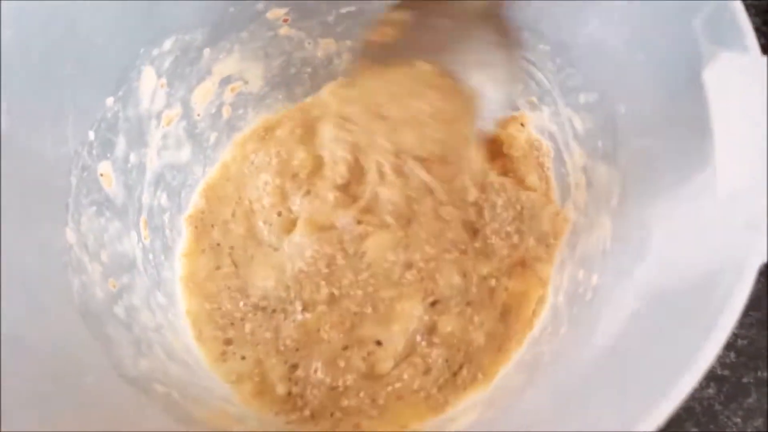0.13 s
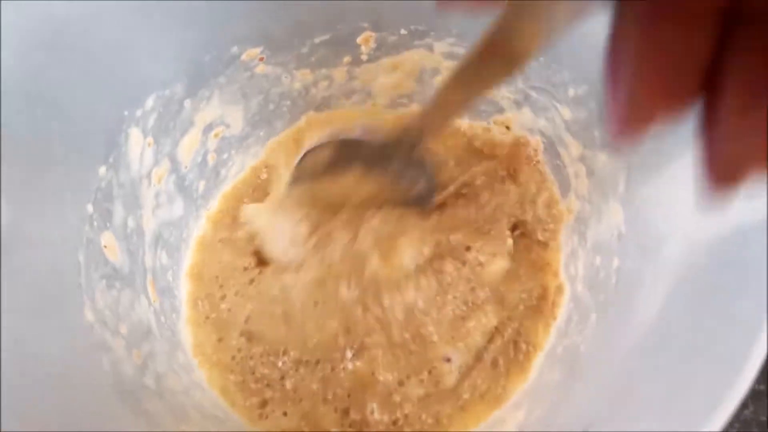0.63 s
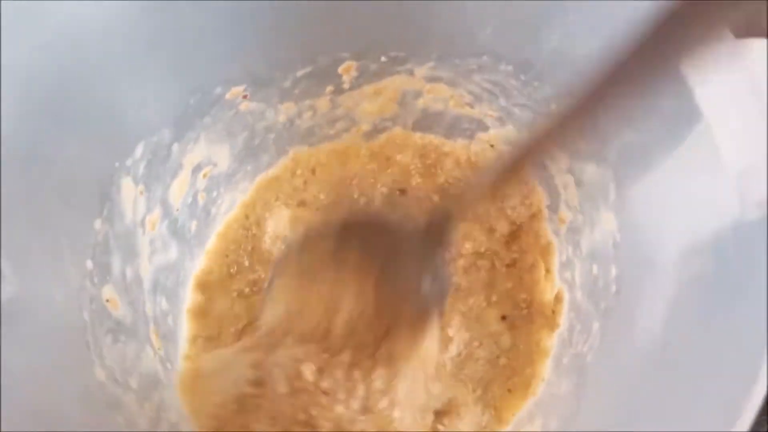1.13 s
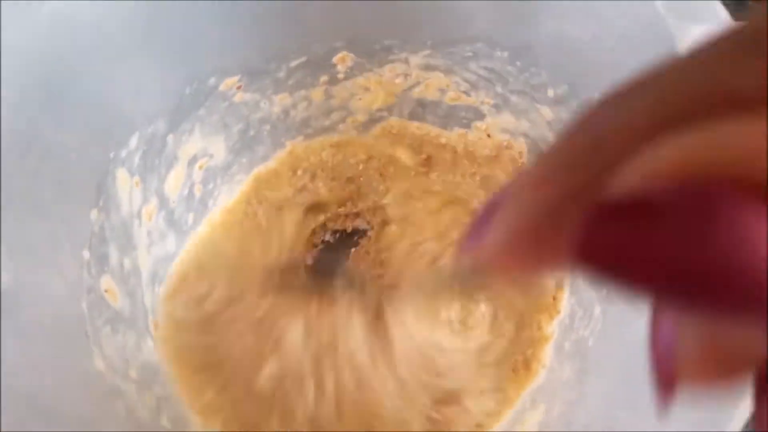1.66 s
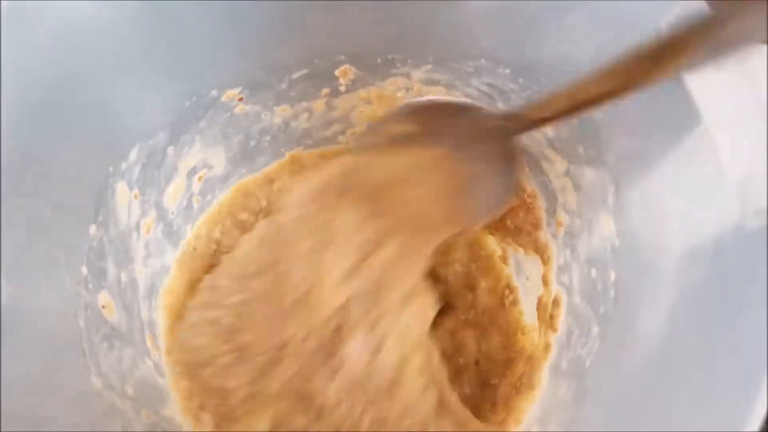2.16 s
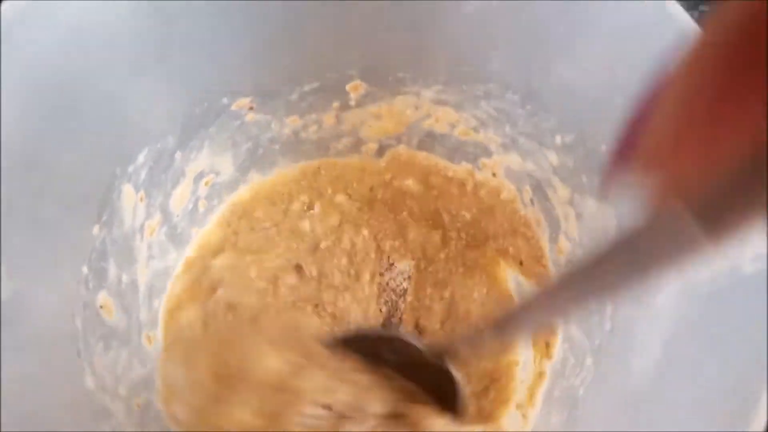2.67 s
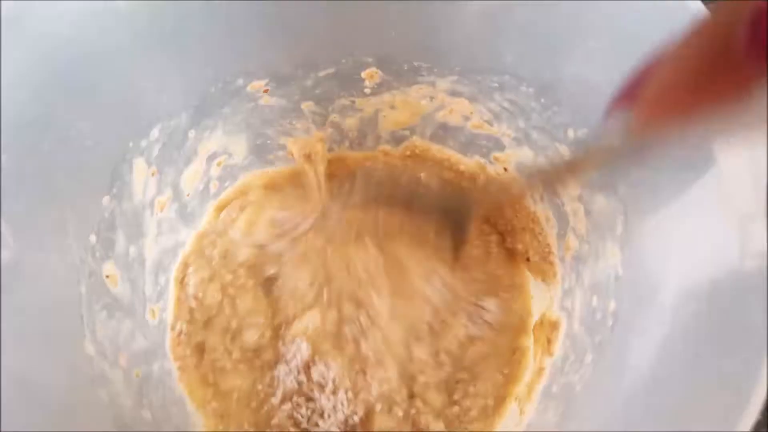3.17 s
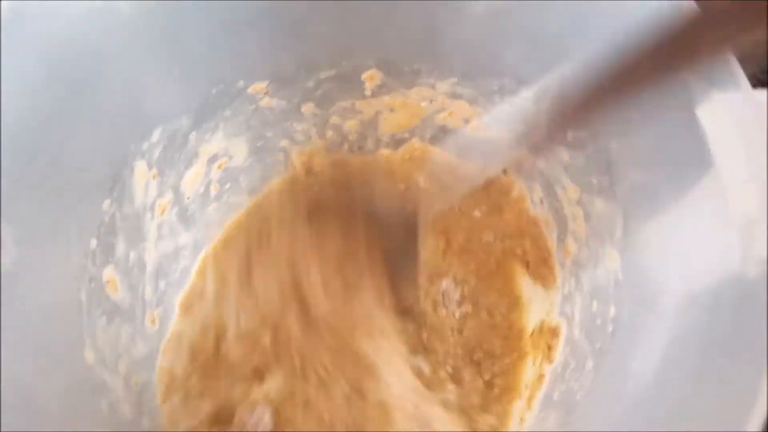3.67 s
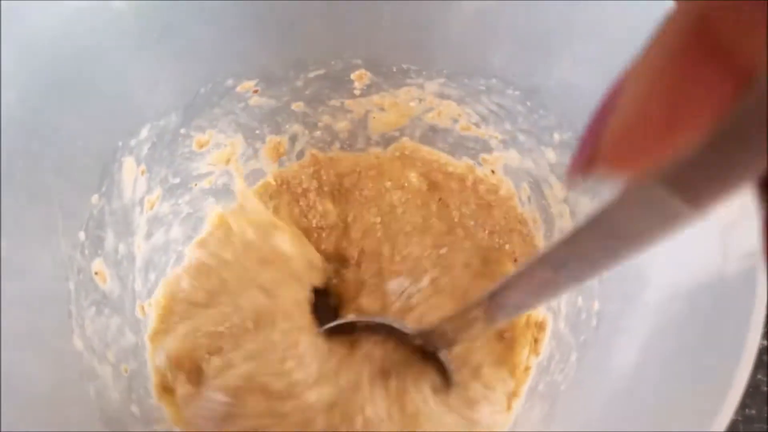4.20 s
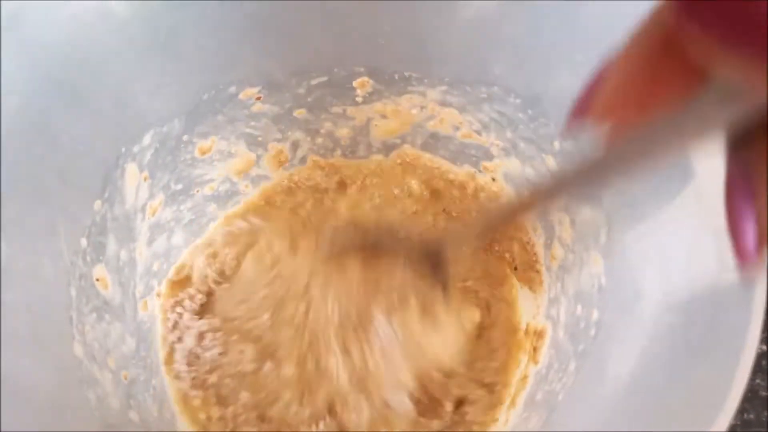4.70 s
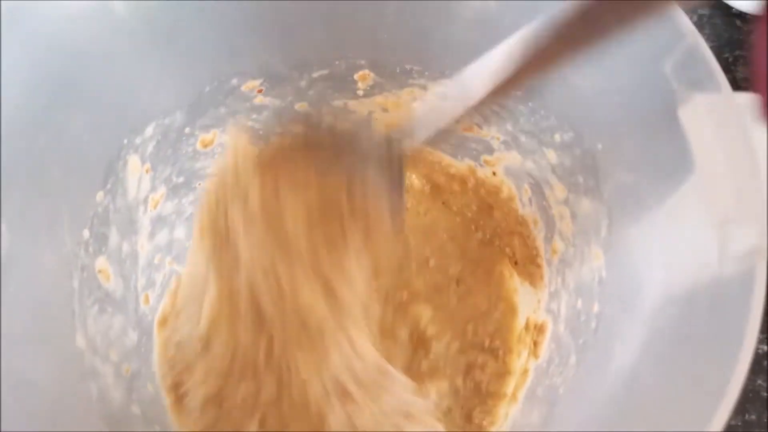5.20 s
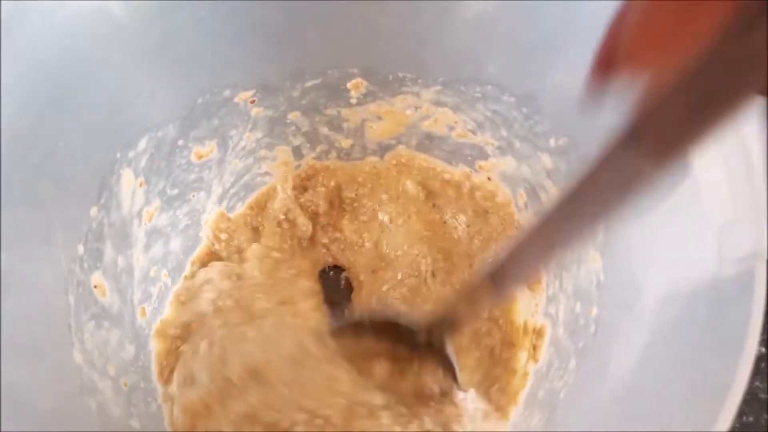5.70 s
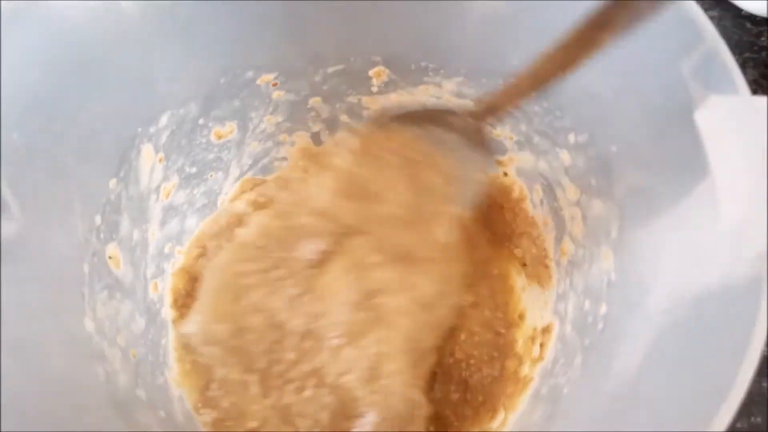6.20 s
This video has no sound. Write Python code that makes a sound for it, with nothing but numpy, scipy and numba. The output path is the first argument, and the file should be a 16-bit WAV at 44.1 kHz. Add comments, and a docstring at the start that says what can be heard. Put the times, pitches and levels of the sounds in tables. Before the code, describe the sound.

Close irregular plastic knocks and short gritty drags of a spoon through sticky batter, with small wet smacks over faint household hum.

```python
"""Spoon beating batter in a plastic jug

A steel spoon beats thick batter on a kitchen worktop, heard just above the rim by two ports.
Knocks ring damped modes of jug and worktop, strokes drag by stick and slip through gritty mix,
and the batter smacks, hisses and ticks as shaped noise. Some knocks and strokes also ring one or
two upper modes. A small hard room of coupled delay lines answers over a faint household hum and hiss."""
import sys
import numpy as np
from scipy import signal
from scipy.fft import rfft, irfft
from scipy.io import wavfile
from scipy.ndimage import uniform_filter1d, map_coordinates
from numba import njit

SR = 44100
rng = np.random.default_rng(int(sys.argv[2]) if len(sys.argv) > 2 else 0)


def transcribe(u):
    """Save the signal u as a 16-bit wav file named by the first command-line argument.

    u: samples, shape (n,) or (channels, n), limited to [-1, 1]; the rate is SR.
    q: integer samples, one column per channel.
    """
    v = np.clip(np.atleast_2d(u).T, -1, 1)
    q = np.round(v * 32767).astype(np.int16)
    wavfile.write(sys.argv[1], SR, q)


def level_to_linear(level):
    """Convert decibel levels to linear amplitude factors, elementwise."""
    exponent = np.asarray(level, float) / 20
    return 10 ** exponent


N = 279594
T = np.arange(N) / SR
# The middling knock, spot and stroke to which the level laws refer.
MIDDLE_DB, MIDDLE_HZ, MIDDLE_HALF_S = -25, 500, 0.03


def level(x, db):
    """Mean power: set the rms level in dB."""
    return x * level_to_linear(db) / np.sqrt(np.mean(x ** 2))


def peak(x, db):
    """Peak amplitude: set the largest excursion in dB."""
    return x * level_to_linear(db) / np.abs(x).max()


def add(out, x, s):
    """Superposition: mix x in at time s."""
    i = int(s * SR)
    out[i:i + len(x)] += x[:N - i]


def colour(x, points):
    """Spectral shaping: filter by (Hz, dB) points joined along log frequency."""
    hz, db = np.transpose(points)
    f = np.arange(len(x) // 2 + 1) * SR / len(x) + 1
    gain = level_to_linear(np.interp(np.log(f), np.log(hz), db))
    return irfft(rfft(x) * gain, len(x))


def ring(modes, gain, detune, length_s=0.425):
    """Modal superposition: the impulse response is a sum of exponentially damped sines."""
    hz, db, t60 = np.transpose(modes)[:, :, None]
    t = T[:int(length_s * SR)]
    decay = np.exp(-np.log(1000) * t / t60)
    return np.sum(gain * level_to_linear(db) * decay * np.sin(2 * np.pi * hz * detune * t), axis=0)


def burst(noise, t60_s):
    """Transient noise: a rise of about half a millisecond, then exponential decay."""
    t = T[:len(noise)]
    return noise * np.exp(-np.log(1000) * t / t60_s) * (1 - np.exp(-t / 0.00058))


def grains(rate, spread_db):
    """Random impulses: sparse clicks of either sign, rate per second, a few much larger than the rest."""
    size = level_to_linear(spread_db * np.minimum(rng.exponential(1, N), 4))
    return (rng.random(N) < rate / SR) * rng.standard_normal(N) * size


# Spoon on the wall. Each row: start in seconds, peak level of the wall in dB, centre of the modes
# that the spot rings in Hz, crack of the edge against the knock in dB.
KNOCKS = [(0.219, -39, 263, -2.5), (0.647, -49, 237, 0.5), (0.791, -33, 556, -9.5), (1.154, -25, 538, -5.5),
          (1.34, -10, 387, -12.5), (1.413, -23, 341, -8.5), (1.673, -23.5, 268, -5), (1.733, -33, 480, -12),
          (1.754, -30.5, 810, -11), (1.766, -28.5, 860, 0), (1.833, -31.5, 311, -35),
          (1.926, -42, 640, -0.5), (2.064, -23.5, 553, -10), (2.105, -31, 650, -3), (2.334, -30.5, 297, -3),
          (2.345, -27, 600, -3), (2.37, -17, 566, -4), (2.449, -30, 430, -5.5), (2.717, -37.5, 855, -2.5),
          (3.004, -20, 550, -15.5), (3.028, -26, 615, 0), (3.158, -49.5, 701, 20.5),
          (3.309, -19, 505, -4.5), (3.389, -10.5, 641, -19), (3.506, -36, 292, 2.5),
          (3.588, -13, 531, -10.5), (3.669, -9, 710, -22), (3.781, -26.5, 480, -21.5), (3.85, -36, 850, 0),
          (3.893, -16.5, 370, -11), (3.911, -42, 459, -9), (4.115, -20, 520, -12.5),
          (4.191, -15.5, 501, -9), (4.425, -34, 800, -2), (4.516, -18, 723, -13), (4.899, -8, 602, -26),
          (5.037, -31.5, 860, -34), (5.112, -21, 527, -12), (5.185, -11.5, 433, -21.5),
          (5.628, -43.5, 806, -7.5), (5.686, -24, 550, -18), (5.695, -24, 707, -11),
          (5.793, -22.5, 367, -23.5), (5.905, -34.5, 410, -5), (6.096, -27, 455, -5.5),
          (6.19, -46.5, 583, 6.5)]
# Jug wall and air. Each row: mode frequency in Hz, relative level in dB, free decay t60 in seconds.
JUG = [(289, -5, 0.044), (344.7, 10, 0.018), (388, -5.5, 0.072), (421, -8, 0.019), (567.5, -12.5, 0.08),
       (615.6, -1, 0.077), (649, 8.5, 0.018), (744, 8.5, 0.018), (956, 5.5, 0.011)]
# Crack of the hard spoon edge. Each row: frequency in Hz, spectral density in dB per Hz.
EDGE = [(600, -5.5), (1100, 9.5), (1450, -8.5), (1900, -2), (2400, -0.5), (4000, -4), (6500, -18),
        (13000, -18.5)]
# Worktop under the jug. Each row: mode frequency in Hz, relative level in dB, t60 in seconds.
WORKTOP = [(60, -12.5, 0.15), (113.5, -13, 0.13), (123.2, -4.5, 0.28), (185, -3, 0.092),
           (203.6, -4.5, 0.29), (214, 13, 0.021)]
# The hand steadies the jug by varying amounts, so more or less reaches the worktop.
# Each row: time in seconds, thump against the crack of the edge in dB.
HOLD = [(0, -4.5), (1.5, -10.5), (2.5, -16), (3.2, -23), (4.5, -9.5), (5.0, -18), (6.3, -20)]
THUMP_FOLLOWS_CRACK, THUMP_DB_PER_OCTAVE = 1, -7  # low spots near the foot shake the worktop more
BODY_LATE_S = 0.0011  # the wall starts just before the crack and swells through it
TOUCH_EARLY_S, TOUCH_DB = 0.012, -27.5  # the batter on the spoon lands just ahead of the steel
SLAM, SLAM_S = 1, 0.0044  # the first cycles stand out before the batter damps the wall
NO_BASS = signal.butter(4, 210, "high", fs=SR, output="sos")


def knocks(spot_octaves=0.76, push_cycles=0.32, detune=0.028, rise_s=0.0016):
    """Impact excitation: a short push rings modes near the struck spot; edge cracks, worktop thumps."""
    body, edge, thump = np.zeros((3, N))
    chance = rng.standard_normal((len(KNOCKS), 2, 16, 1))
    noises = rng.standard_normal((len(KNOCKS), 2, 4096))
    for (s, db, hz, crack_db), (a, b), (noise, rock) in zip(KNOCKS, chance, noises):
        push = np.hanning(int(push_cycles * SR / hz) + 3)
        # the spoon chatters on after the blow
        push = np.convolve(push, np.r_[1, 0.014 * burst(noise, 0.05)])

        near = np.exp(-(np.log2(np.array(JUG)[:, :1] / hz) / spot_octaves) ** 2 / 2)
        modes = ring(JUG, near * level_to_linear(3.2 * a[:len(JUG)]), 1 + 0.0077 * b[:len(JUG)], 0.14)
        wall = np.convolve(modes, push)
        t = T[:len(wall)]
        # the bending wave needs a cycle to spread, and the small wall radiates no bass
        wall = signal.sosfilt(NO_BASS, wall * (1 - np.exp(-(t / rise_s) ** 2)))
        wall = wall * (1 + SLAM * np.exp(-(t / SLAM_S) ** 2))
        add(body, peak(wall, db), s + BODY_LATE_S)
        add(body, peak(wall, db + TOUCH_DB), s - TOUCH_EARLY_S)

        crack = burst(colour(noise, EDGE), 0.04) + 7.45 * burst(colour(rock, EDGE), 0.0041)
        add(edge, peak(crack, db + crack_db), s + rise_s)

        low = ring(WORKTOP, level_to_linear(3.0 * a[:len(WORKTOP)]), 1 + detune * b[:len(WORKTOP)])
        thump_db = (MIDDLE_DB + THUMP_FOLLOWS_CRACK * (db + crack_db - MIDDLE_DB)
                    + np.interp(s, *np.transpose(HOLD))
                    + THUMP_DB_PER_OCTAVE * np.log2(hz / MIDDLE_HZ))
        # the jug rocks on its foot for a moment, so the worktop is shaken rather than struck once
        add(thump, peak(signal.fftconvolve(low, burst(rock, 0.46)), thump_db), s)
    return body, edge, thump


# Strokes dragged through the mix. Each row: centre in seconds, half length in seconds,
# jug wall level at the centre in dB.
DRAG = [(0.187, 0.21, -72), (0.486, 0.033, -52), (0.675, 0.019, -57.5), (0.841, 0.041, -57),
        (1.029, 0.04, -59.5), (1.214, 0.038, -59), (1.474, 0.06, -50), (1.759, 0.013, -47),
        (1.8, 0.06, -57.5), (2.101, 0.025, -51.5), (2.198, 0.11, -59.5), (2.563, 0.037, -58),
        (2.624, 0.02, -59.5), (2.745, 0.042, -52.5), (2.917, 0.036, -53), (3.107, 0.056, -51),
        (3.242, 0.014, -54.5), (3.503, 0.015, -59.5), (3.616, 0.0062, -49), (3.72, 0.13, -47.5),
        (3.924, 0.012, -44), (3.98, 0.041, -57), (4.227, 0.0085, -42), (4.298, 0.04, -57),
        (4.61, 0.076, -60), (4.713, 0.036, -62.5), (4.98, 0.11, -56.5), (5.041, 0.011, -52.5),
        (5.125, 0.0075, -53), (5.295, 0.054, -53), (5.5, 0.03, -64.5), (5.66, 0.0061, -56),
        (5.729, 0.0093, -40), (5.782, 0.032, -56.5), (6.213, 0.041, -54)]
# Quick strokes scratch, slow ones rumble: grit against the wall, and its change per doubled length.
GRIT_DB, GRIT_DB_PER_DOUBLING = -4.5, -5
# After each knock the spoon skids on along the wall; the skid's grit is set against the crack.
SKID_AFTER_S, SKID_HALF_S, SKID_WALL_DB, SKID_FOLLOWS_KNOCK, SKID_GRIT_DB = 0.045, 0.032, -59, 0.8, -34


def stroke_gains():
    """Power addition: bell-shaped strokes and skids sum into gains for the wall and the grit."""
    s, half_s, wall_db = np.transpose(DRAG)
    hit_s, hit_db, _, crack_db = np.transpose(KNOCKS)
    grit_db = wall_db + GRIT_DB + GRIT_DB_PER_DOUBLING * np.log2(half_s / MIDDLE_HALF_S)

    s = np.r_[s, hit_s + SKID_AFTER_S][:, None]
    half_s = np.r_[half_s, np.full(len(KNOCKS), SKID_HALF_S)][:, None]
    wall_db = np.r_[wall_db, SKID_WALL_DB + SKID_FOLLOWS_KNOCK * (hit_db - MIDDLE_DB)][:, None]
    grit_db = np.r_[grit_db, hit_db + crack_db + SKID_GRIT_DB][:, None]

    coarse = T[::32]
    swell = np.exp(-((coarse - s) / half_s) ** 2)
    return [np.interp(T, coarse, np.sqrt(np.sum(level_to_linear(2 * db) * swell, axis=0))) for db in (wall_db, grit_db)]


# Grit under the edge. Each row: frequency in Hz, spectral density in dB per Hz.
GRIT = [(700, -34), (1100, -3.5), (1550, -1), (1850, 1), (2300, -4), (4200, -7.5), (6000, -22),
        (11000, -19.5), (16000, -22)]
# Upper ring of spoon and wall, damped by the batter. Each row: nominal mode frequency in Hz,
# relative level in dB, t60 in seconds.
CLACK = [(1620, -3, 0.029), (1815, 3.5, 0.04), (1990, 2, 0.09), (2887, -12.5, 0.041)]
CLACK_IN_GRIT_DB = -12.5  # against the grit


def drag():
    """Stick-slip friction: slips shake the damped wall, grains crackle, torn batter hisses."""
    wall_gain, grit_gain = stroke_gains()
    # the grip is never even: it catches and lets go a hundred times a second
    catch = level_to_linear(level(uniform_filter1d(rng.standard_normal(N), size=300), 0)) ** 3.0

    slips = grains(1300, 1.6) + 0.21 * rng.standard_normal(N)
    signs = rng.choice([-1, 1], (len(JUG), 1))
    # the spoon pressed on the wall halves every decay time
    pressed = np.array(JUG) * [1, 1, 0.5]
    wall = level(signal.fftconvolve(slips * catch, ring(pressed, signs, 1, 0.1))[:N], 0)

    scratch = (grains(1400, 3.0) + 0.3 * rng.standard_normal(N)) * catch
    clack = signal.fftconvolve(scratch, ring(CLACK, 1, 1, 0.06))[:N]
    grit = level(colour(scratch, GRIT), 0) + level(clack, CLACK_IN_GRIT_DB)

    # the hiss comes from a wide patch, so each port hears its own
    hiss_tone = [(1500, -29.0), (5000, 6.5), (12000, 1)]
    hiss = np.array([colour(v * np.sqrt(catch), hiss_tone) for v in rng.standard_normal((2, N))])
    return wall * wall_gain, grit * grit_gain, level(hiss, -12.5) * grit_gain


# Wet smacks of the batter. Each row: start in seconds, peak level in dB, centre frequency in Hz.
SMACKS = [(1.245, -46, 4630), (1.485, -35.5, 3650), (1.498, -39, 7700), (1.6726, -19.5, 12200),
          (1.744, -29.5, 4160), (1.795, -32, 11200), (1.809, -47, 6530), (1.8842, -45, 8700),
          (1.929, -36.5, 6660), (2.0506, -43.5, 10100), (2.093, -42, 3830), (2.4274, -33, 3300),
          (2.438, -38, 2500), (2.911, -37, 11100), (3.227, -34, 2960), (3.238, -38, 4530),
          (3.319, -35, 7100), (3.381, -58, 3800), (3.496, -42.5, 3160), (3.661, -44.5, 2320),
          (3.8113, -40.5, 3370), (3.8487, -32.5, 2840), (4.1697, -34, 3650), (4.229, -37, 3400),
          (4.316, -43.5, 3810), (4.471, -50, 4000), (4.615, -36, 3050), (4.7507, -45, 10360),
          (5.023, -50, 3000), (5.055, -49, 2800), (5.272, -39.5, 3700), (5.728, -29, 4900),
          (5.734, -28.5, 4300), (6.135, -40, 13000)]


def smacks(t60_s=0.009, octaves=0.9):
    """Film rupture: a bursting film of batter gives a few milliseconds of broad noise."""
    out = np.zeros(N)
    for (s, db, hz), noise in zip(SMACKS, rng.standard_normal((len(SMACKS), 1024))):
        tone = [(hz / 2 ** (3 * octaves), -30), (hz / 2 ** octaves, -7), (hz, 0), (hz * 2 ** octaves, -7)]
        add(out, peak(burst(colour(noise, tone), t60_s), db), s)
    return out


# Some knocks and strokes also ring one or two of the upper modes.
# Each row: start in seconds, peak level in dB, centre of the modes picked out in Hz.
UPPER_RINGS = [(3.31, -33.5, 1815), (3.894, -37.5, 1990), (3.912, -30, 1815), (4.115, -29, 1620),
               (4.517, -32, 1810), (5.119, -39.5, 1900), (5.729, -27, 1815)]


def upper_rings(octaves=0.057):
    """Selective modal excitation: some knocks and strokes also ring one or two of the upper modes."""
    out = np.zeros(N)
    for s, db, hz in UPPER_RINGS:
        near = np.exp(-(np.log2(np.array(CLACK)[:, :1] / hz) / octaves) ** 2 / 2)
        # the modes sound one per cent below their nominal pitch
        add(out, peak(ring(CLACK, near, 0.99, 0.06), db), s)
    return out


def fizz():
    """Bubble noise: tiny air bubbles in the mix tick high and faint all the time."""
    ticks = np.convolve(grains(96, 1.6), np.ones(36))[:N] * rng.standard_normal(N)
    return level(colour(ticks, [(1500, -30), (5000, -5), (12000, -2)]), -77)


# How the ports lean over the jug. Each row: time in seconds, left minus right in dB.
LEAN = [(2.6, 1), (3.0, -2.2)]
# Colour of the ports. Each row: frequency in Hz, left minus right in dB.
SIDES = [(60, 8), (120, 0), (300, 4.5), (650, 1), (1500, 4.5), (2600, 9), (4000, -2.5), (8000, 1)]


def ports(x, lag_s):
    """Interaural-style differences: the left port hears x late; each has its own colour and lean."""
    late = map_coordinates(x, [(T - lag_s) * SR], order=3)
    hz, db = np.transpose(SIDES)
    lean = np.interp(T, *np.transpose(LEAN))
    sides = [(1, late), (-1, x)]
    return np.array([colour(v, np.transpose([hz, k * db / 2])) * level_to_linear(k * lean / 2) for k, v in sides])


SHAKE_DB, SHAKE_HZ = -2, 95


def shake(thump):
    """Antiphase motion: the lowest thump, 3 ms late, moves the two ports against each other."""
    late = np.roll(thump, int(0.003 * SR))
    low = signal.sosfilt(signal.butter(4, SHAKE_HZ, fs=SR, output="sos"), late)
    return level_to_linear(SHAKE_DB) * low * np.array([[1], [-1]])


@njit
def walls(x, lags, gain, damp):
    """Feedback delay network: eight delay lines feed each other, duller on every round."""
    line, soft, out = np.zeros((8, 4096)), np.zeros(8), np.zeros((2, len(x)))
    for i in range(len(x)):
        total = 0.
        for k in range(8):
            soft[k] += (1 - damp) * (gain[k] * line[k, (i - lags[k]) & 4095] - soft[k])
            total += soft[k]
            out[k % 2, i] += soft[k] * (1 - (k & 2))
        for k in range(8):
            line[k, i & 4095] = x[i] + 1e-18 + soft[k] - total / 4
    return out


# Household noise. Each row: frequency in Hz, relative spectral density in dB per Hz.
HOUSE = [(30, -40), (60, -5), (105, -1), (226, -8), (372, -17.5), (820, -7.5), (890, -11.5), (1150, -21.5),
         (4600, -31.5), (14500, -26), (16000, -39.5)]
HOUSE_DB = -70.5  # rms


def house():
    """Partial coherence: steady rumble and hiss whose lower part is partly shared by both ports."""
    shared = colour(rng.standard_normal(N), [(300, -6.0), (900, -6.0), (2000, -52.0)])
    own = rng.standard_normal((2, N))
    return level(np.array([colour(0.7 * shared + v, HOUSE) for v in own]), HOUSE_DB)


# Faint steady tones. Each row: mean frequency in Hz, rms level in dB.
HUM = [(102, -79), (592, -88), (888, -84)]


def hum(wander=0.0024):
    """Frequency modulation: thin tones wander a little in pitch."""
    drift = level(uniform_filter1d(rng.standard_normal((len(HUM), N)), size=4000), 0)
    hz, db = np.transpose(HUM)[:, :, None]
    phase = 2 * np.pi * np.cumsum(hz * (1 + wander * drift), axis=1) / SR
    return np.sum(np.sqrt(2) * level_to_linear(db) * np.sin(phase), axis=0)


ROOM_T60_S, ROOM_DAMP, ROOM_DB = 0.36, 0.49, -20.5  # t60 before the damping of the treble
LAG_S, WET_LAG_S, ROUND_HZ = 0.000066, 0.0003377, 4  # the left port is further off; wet lag is the mean


def scene():
    """Superposition: jug, worktop and batter at two ports, with the room and kitchen behind."""
    body, edge, thump = knocks()
    wall, grit, hiss = drag()
    solid = body + wall + thump
    wet = edge + smacks() + upper_rings() + grit + fizz()

    lags = rng.integers(300, 1800, 8)  # samples
    room = walls(solid + 0.5 * wet, lags, level_to_linear(-60 * lags / SR / ROOM_T60_S), ROOM_DAMP)
    # the spoon circles, so the lag swings
    swing = 1 + 0.7 * np.sin(2 * np.pi * ROUND_HZ * T)
    near = ports(solid, LAG_S) + ports(wet, WET_LAG_S * swing)
    return near + hiss + shake(thump) + level_to_linear(ROOM_DB) * room + house() + hum()


def band_limit(x):
    """A steep low-pass at the top of the band."""
    return signal.sosfilt(signal.butter(12, 16970, fs=SR, output="sos"), x)


def record(dry):
    """Band limiting: a steep low-pass and a gentler high-pass cut both ends of the spectrum."""
    x = signal.sosfilt(signal.ellip(8, 0.2, 60, 15750, fs=SR, output="sos"), dry)
    mix = signal.sosfilt(signal.butter(4, 48, "high", fs=SR, output="sos"), x)
    return band_limit(mix)


dry = scene()
out = record(dry)
transcribe(out)
```